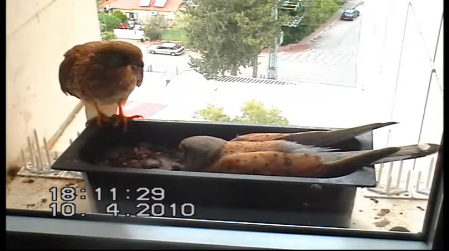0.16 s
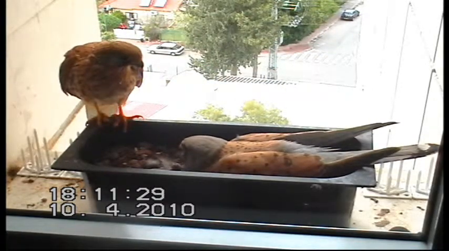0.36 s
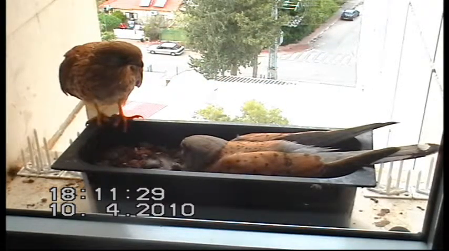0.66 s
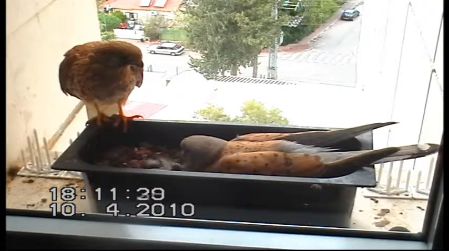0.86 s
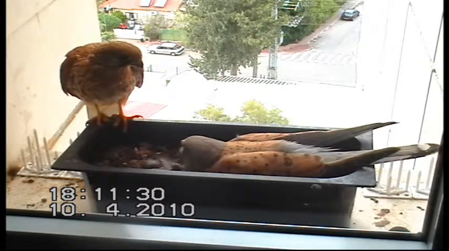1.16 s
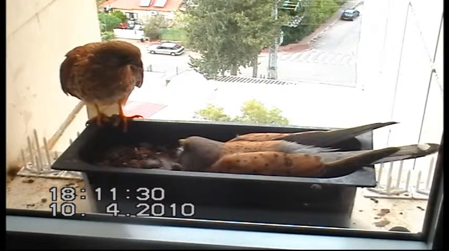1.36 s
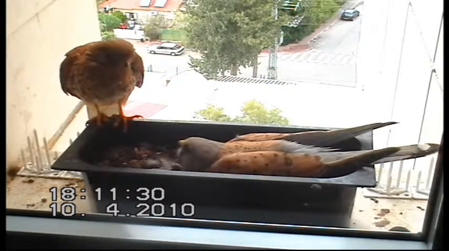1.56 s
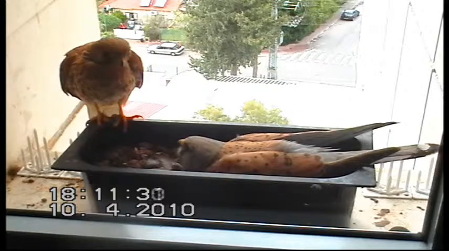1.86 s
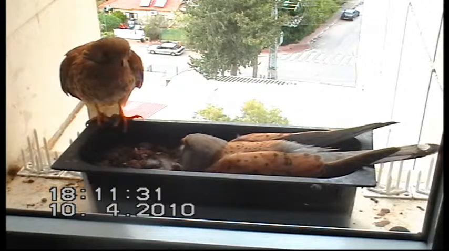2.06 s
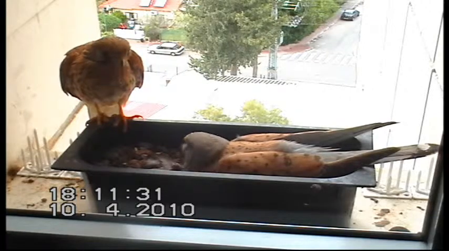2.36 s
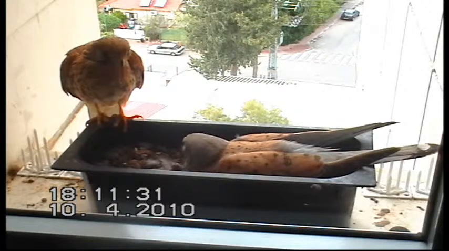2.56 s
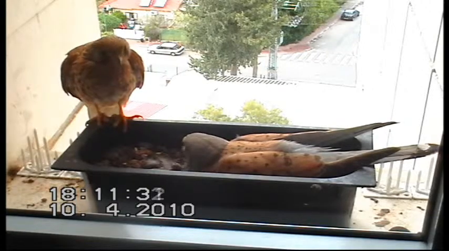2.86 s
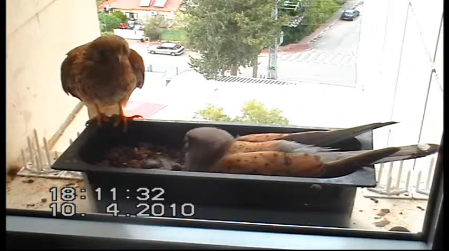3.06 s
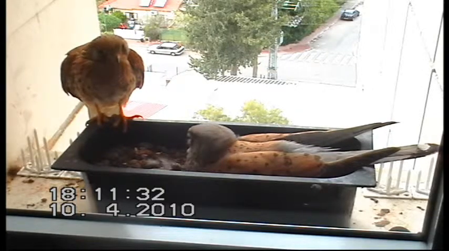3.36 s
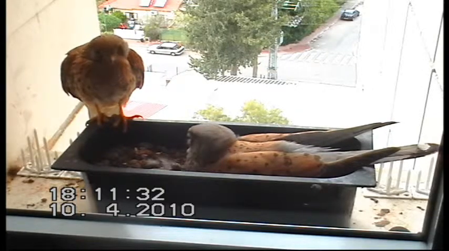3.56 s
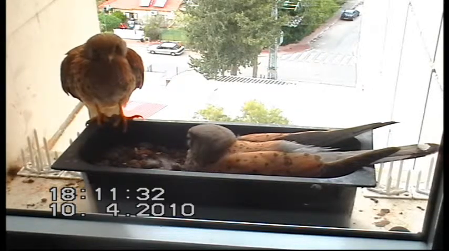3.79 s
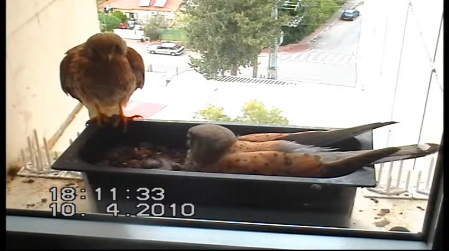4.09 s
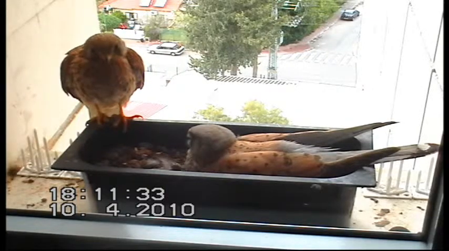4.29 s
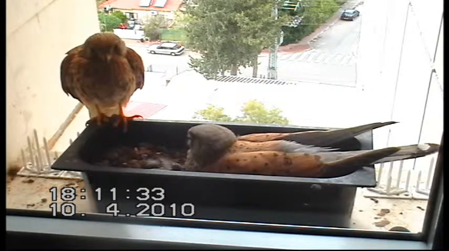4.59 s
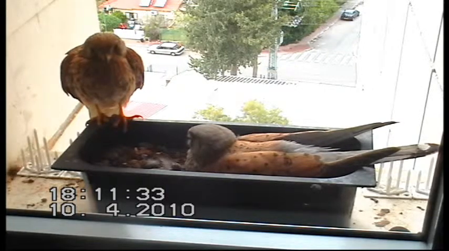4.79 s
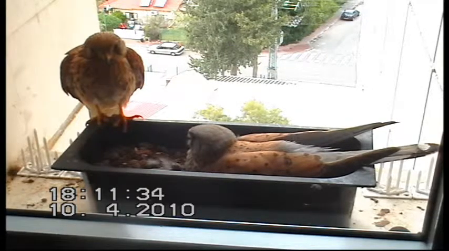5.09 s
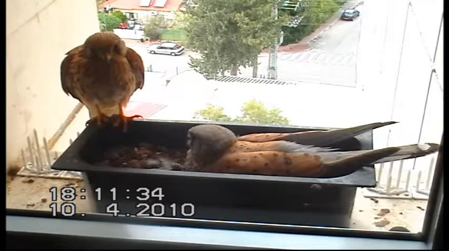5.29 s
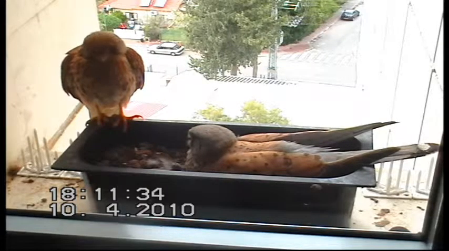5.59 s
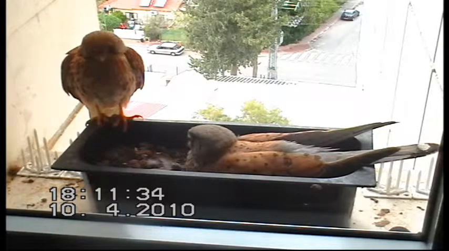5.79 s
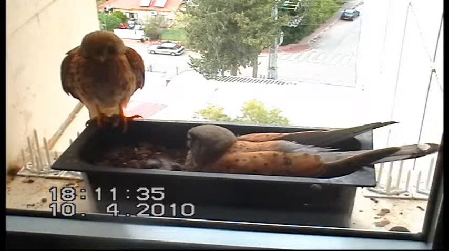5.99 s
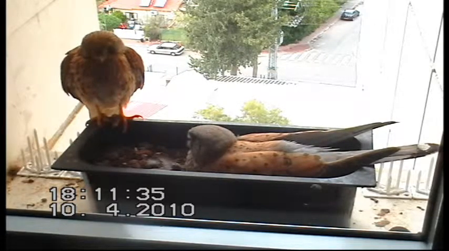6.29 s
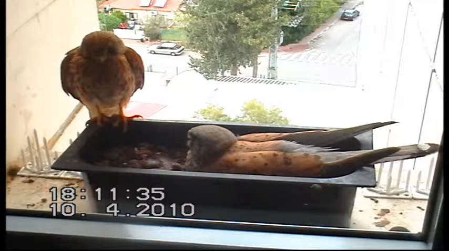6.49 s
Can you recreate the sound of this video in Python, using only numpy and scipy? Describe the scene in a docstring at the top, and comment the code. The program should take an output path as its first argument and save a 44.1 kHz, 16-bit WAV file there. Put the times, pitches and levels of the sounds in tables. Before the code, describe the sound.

Two small falcons call close to a single microphone at a balcony nest box. A low rough cluck right at the start is overlapped by a sharp, high, raspy chip. More chips follow at about 0.5, 1.0, 1.5, 1.85, 2.3, 2.75 and 3.3 seconds, each a tiny piercing burst of around two hundredths of a second, with a quieter, buzzy, lower cluck at 1.3. After a gap, one last, slightly lower chip comes at 4.2, then softer harsh clucks at 4.55, 5.0 and 6.3. A barely noticeable tick leads each call, and hard surfaces return a quick boxy slap with a very short tail. Throughout, faint traffic far below rumbles and whooshes, wavering and thinning towards the end, with weak drones swelling. Tiny distant birds twitter near 1.7, 2.5, 3.6, 4.75 and after 6.1 seconds. Light hiss; centred sound.

```python
"""Two kestrels at a balcony nest box

They trade short sharp chips and a few lower, harsher clucks, each led by a faint tick.
The calls are sums of harmonics under one arch of effort, with jitter and air noise for roughness.
Box, wall and window throw them back: discrete echoes, scatter and a thin tail in one impulse response.
Far below, shaped noise makes the traffic of a quiet street, and small birds twitter as wobbling sines."""
import sys
import numpy as np
from scipy import signal
from scipy.fft import rfft, irfft
from scipy.io import wavfile

SR = 44100
rng = np.random.default_rng(int(sys.argv[2]) if len(sys.argv) > 2 else 0)


def unload_wav(signal):
    """Save mono or channel-first audio to the path in sys.argv[1] as 16-bit WAV at rate SR, clipped to [-1, 1]."""
    wavfile.write(
        sys.argv[1],
        SR,
        np.round(np.clip(np.atleast_2d(signal).T, -1, 1) * 32767).astype(np.int16),
    )


N = 292824
TIME_S = np.arange(N) / SR
BINS_HZ = np.maximum(np.fft.rfftfreq(N, 1 / SR), 1)

# high chips: (time [s], tick lead [s], pitch [Hz], length [s], fundamental [dB], octave [dB],
#   top harmonics re octave [dB], half-order lines [dB])
CHIPS = [(.033, .023, 3585, .021, -21.2, -16.7, -18, -31),
         (.525, .023, 3690, .022, -22.3, -17.6, -18, -32.5),
         (1.017, .019, 3709, .026, -21.4, -20.6, -16, -40),
         (1.48, .021, 3570, .021, -20.7, -16.2, -17, -31.5),
         (1.846, .022, 3496, .021, -17.7, -14.1, -19, -39.5),
         (2.266, .02, 3535, .024, -19.2, -19.2, -17.5, -55.5),
         (2.748, .024, 3585, .02, -23, -14.2, -24, -46), (3.306, .022, 3530, .021, -21, -19, -16, -40),
         (4.182, .024, 3330, .016, -19, -16.8, -20, -39)]
# low clucks: (time [s], tick lead [s], pitch [Hz], starting pitch [ratio], length [s], level [dB],
#   lift of harmonics 2 and 4 [dB], tilt about harmonic 3 [dB/harmonic],
#   slope above harmonic 5 [dB/harmonic], roughness [0-1])
CLUCKS = [(-.011, .024, 1445, 1.0, .024, -31.7, -4.5, -1.5, -1.5, .35),
          (1.327, .021, 1475, 1.0, .023, -26.8, -4, -.5, -2.6, .54),
          (4.553, .0196, 1478, 1.0, .023, -29, 0, -1.1, -1.8, .52),
          (4.983, .026, 1590, 1.06, .016, -30.3, 11.2, 1.1, -6, .22),
          (6.325, .024, 1530, 1.09, .02, -28, -.7, 1.2, -10, .34)]
# low rumble spectrum: (frequency [Hz], relative level [dB per Hz])
RUMBLE = [(12, -7), (25, -1), (45, 0.5), (65, -3), (120, -8), (210, -14.5), (280, -14.5), (400, -23.5),
          (700, -34), (1500, -61)]


def from_db(db):
    """Decibels to gain."""
    return 10 ** (np.asarray(db) / 20)


def rms_one(x):
    """Scale to rms 1."""
    return x / np.sqrt(np.mean(x ** 2) + 1e-20)


def add(track, start_s, sound):
    """Mix a sound into a track, dropping what falls outside it."""
    at = round(start_s * SR) + np.arange(len(sound))
    inside = (at >= 0) & (at < N)
    track[at[inside]] += sound[inside]


def band(x, low_hz, high_hz):
    """Causal band-pass."""
    sos = signal.butter(2, [low_hz, min(high_hz, .45 * SR)], "band", fs=SR, output="sos")
    return signal.sosfilt(sos, x)


def wobble(size, rate_hz):
    """Random curve: unit-variance knots at rate_hz, joined by straight lines."""
    position = np.arange(size) * rate_hz / SR
    knots = int(position[-1]) + 2
    return np.interp(position, np.arange(knots), rng.standard_normal(knots))


def noise(spectrum, peaks=()):
    """Noise of rms 1 with a smooth spectrum and resonances on top."""
    hz, db = np.transpose(spectrum)
    level_db = np.interp(np.log(BINS_HZ), np.log(hz), db)
    for centre_hz, width_hz, lift_db in peaks:
        level_db = level_db + lift_db / (1 + (2 * (BINS_HZ - centre_hz) / width_hz) ** 2)
    return rms_one(irfft(rfft(rng.standard_normal(N)) * from_db(level_db), N))


def street(rumble_db=-58.5, engine_lift_db=.2, waver_db=.4, waver_hz=3):
    """Far traffic: steady rumble, engine and tyre noise of wavering level, drones that swell and fade."""
    # spectra: (frequency [Hz], relative level [dB per Hz])
    engine_spectrum = [(250, -28), (450, -8.5), (560, -0.5), (760, -2.5), (1100, -3.5), (1700, -3.5),
                       (2200, -2), (2800, -8), (4500, -30)]
    tyre_spectrum = [(1000, -19.5), (2000, -11), (2800, 2.5), (3500, -3.5), (4500, -8.5), (6000, -16),
                     (8000, -32), (12000, -45)]
    # resonances colouring the engines: (centre [Hz], width [Hz], lift [dB])
    colour = [(285, 60, 1.5), (860, 81, 8.5), (1018, 70, 7), (1201, 100, 7), (1426, 88, 7),
              (2016, 120, 3.5)]
    # level course: (time [s], engines before lift [dB], tyres [dB])
    levels = [(0.0, -58, -63), (0.29, -62, -67), (0.89, -60, -63), (1.89, -61, -64), (2.03, -62, -67),
              (3.29, -62, -65), (3.59, -62, -66), (4.01, -63, -62), (4.6, -62, -67), (5.53, -62, -70),
              (5.66, -63, -68), (6.64, -65, -70)]
    # drones: (middle [s], spread [s], centre [Hz], width [Hz], level at the middle [dB])
    passes = [(.48, .32, 2196, 220, -61.5), (.96, .16, 1150, 600, -62), (2.55, .45, 1440, 120, -68),
              (3.15, .23, 675.5, 100, -68.5), (3.9, .18, 3095, 1000, -61), (4.75, .655, 867.9, 60, -66),
              (5.65, .266, 1226, 80, -66.5), (5.62, .15, 2600, 700, -70)]

    level_s, engine_db, tyre_db = np.transpose(levels)
    waver = waver_db * wobble(N, waver_hz)
    engine_gain = from_db(np.interp(TIME_S, level_s, engine_db) + engine_lift_db + waver)
    tyre_gain = from_db(np.interp(TIME_S, level_s, tyre_db) + waver)
    out = from_db(rumble_db) * noise(RUMBLE)
    out += engine_gain * noise([*engine_spectrum, (9000, -69.5)], colour)
    out += tyre_gain * noise(tyre_spectrum)
    for middle_s, spread_s, hz, width_hz, db in passes:
        drone = rms_one(band(rng.standard_normal(N), hz - width_hz / 2, hz + width_hz / 2))
        swell = np.exp(-((TIME_S - middle_s) / spread_s) ** 2)
        out += from_db(db) * drone * swell
    return out


def twitters(lift_db=2.5):
    """Distant small birds: sines of unsteady pitch with soft edges."""
    # (time [s], pitch [Hz], length [s], peak level before lift [dB])
    twitter_notes = [(1.70, 7000, .06, -76.5), (2.53, 5040, 0.046, -70.5), (3.607, 5060, .06, -69),
                     (4.744, 6270, .07, -78), (4.755, 5350, 0.057, -75), (6.169, 5720, .05, -76),
                     (6.509, 5300, 0.034, -77)]
    out = np.zeros(N)
    for start_s, hz, length_s, db in twitter_notes:
        size = int(length_s * SR)
        phase = 2 * np.pi * np.cumsum(hz * (1 + .065 * wobble(size, 900))) / SR
        add(out, start_s, from_db(db + lift_db) * np.sin(phase) * signal.windows.tukey(size, .7))
    return out


def balcony(x, scatter_db=-9, scatter_t60_s=.065, tail_db=-30, tail_t60_s=.2, tail_top_hz=8500):
    """A few hard echoes, quick scatter in the nest box, and a thin, duller tail from the open balcony."""
    # box walls, window and floor: (delay [s], level re direct [dB])
    echo_taps = [(.00111, -19), (.00206, -17.5), (.0029, -21), (.0032, -19), (.00444, -21), (.00669, -10.5),
                 (.0112, -19), (.0153, -23)]
    t = np.arange(SR // 3) / SR
    scatter, tail = rng.standard_normal((2, len(t))) * np.minimum(t / .005, 1)
    scatter = scatter * from_db(-60 * t / scatter_t60_s)
    tail = band(tail, 500, tail_top_hz) * from_db(-60 * t / tail_t60_s)
    response = from_db(scatter_db) * scatter / np.linalg.norm(scatter)
    response += from_db(tail_db) * tail / np.linalg.norm(tail)
    response[0] = 1  # direct sound
    for delay_s, db in echo_taps:
        response[round(delay_s * SR)] += from_db(db)
    return signal.fftconvolve(x, response)[:N]


def rasp(size, low_hz, high_hz):
    """Air noise with steep band edges, rms 1."""
    return rms_one(band(band(rng.standard_normal(size), low_hz, high_hz), low_hz, high_hz))


def box_colour(x, low_hz=3130, high_hz=14500):
    """Keeps the chip between its fundamental and the far treble, and rings near its two main lines."""
    # resonances of the nest box around the bird: (centre [Hz], width [Hz], added level [dB])
    resonances = [(3457, 110, -6), (7160, 400, -14)]
    x = band(band(x, low_hz, high_hz), low_hz, high_hz)
    out = x.copy()
    for hz, width_hz, db in resonances:
        b, a = signal.iirpeak(hz, hz / width_hz, fs=SR)
        out += from_db(db) * signal.lfilter(b, a, x)
    return out


def syrinx(gesture, pitch_hz, length_s, jitter, jitter_hz, shimmer_db, start_ratio=1):
    """Phase and strength of the vibrating membrane through one note; its pitch bends with the effort."""
    size = int(length_s * SR)
    along = np.arange(size) / size
    peak, start_db, end_db, bend_per_db = gesture
    rise_db = start_db * (1 - along / peak) ** 2
    fall_db = end_db * ((along - peak) / (1 - peak)) ** 2
    effort_db = np.where(along < peak, rise_db, fall_db)
    settling = np.interp(along, [.2, .45], [start_ratio, 1])
    hz = pitch_hz * settling * (1 + bend_per_db * effort_db) * (1 + jitter * wobble(size, jitter_hz))
    effort = from_db(effort_db + shimmer_db * wobble(size, jitter_hz))
    return 2 * np.pi * np.cumsum(hz) / SR, effort * signal.windows.tukey(size, .08)


def ticks(pitch_hz=1630, decay_s=.0055, start_db=-44.5):
    """A faint tick just before each call: unsteady harmonics and noise, band-passed, dying away fast."""
    out, t = np.zeros(N), np.arange(SR // 60) / SR
    for start_s, lead_s, *_ in [*CHIPS, *CLUCKS]:
        phase = 2 * np.pi * np.cumsum(pitch_hz * (1 + .06 * wobble(len(t), 700))) / SR
        buzz = sum(np.sin(k * phase + k * k) for k in range(1, 8)) + rng.standard_normal(len(t))
        tick = rms_one(band(buzz, 2500, 5400)) * np.exp(-t / decay_s)
        add(out, start_s - lead_s, from_db(start_db) * tick)
    return out


def clucks(rasp_db=-33, crack_db=-35, crack_decay_s=.003):
    """The low register: a crack as the membrane starts, then a buzzy stack of unsteady harmonics."""
    # arch of effort: (peak [share of length], start [dB], end [dB], pitch change [1/dB of effort])
    cluck_gesture = (.33, -11, -22, .004)
    # harmonics 1-5 before each cluck's own lift and tilt: level [dB]
    harmonics_db = np.array([-6.3, -2.9, 0, -3.9, -10.6])
    out = np.zeros(N)
    overtone = np.arange(len(harmonics_db))
    for start_s, _, pitch_hz, start_ratio, length_s, level_db, even_db, tilt_db, slope_db, rough in CLUCKS:
        phase, effort = syrinx(cluck_gesture, pitch_hz, length_s, .039 * rough, 900, 3.4 * rough, start_ratio)
        size = len(phase)
        lower_db = level_db + harmonics_db + even_db * (overtone % 2) + tilt_db * (overtone - 2)
        upper_db = lower_db[-1] + slope_db * np.arange(1, 5)
        note = np.zeros(size)
        for k, db in enumerate(np.concatenate([lower_db, upper_db])):
            unsteady = 1 + .84 * rough * wobble(size, 700)
            # k * k [rad] spreads the phases of the harmonics
            note += from_db(db) * unsteady * np.sin((k + 1) * phase + k * k)
        crack = from_db(crack_db) * np.exp(-np.arange(size) / SR / crack_decay_s)
        air = from_db(rasp_db) * rough * np.sqrt(effort) + crack
        add(out, start_s, effort * note + air * rasp(size, 2500, 7800))
    return out


def chips(fourth_db=-10, onset_db=-4, onset_decay_s=.002):
    """A thin, rough note; its octave grows faster than its fundamental when the bird drives it harder."""
    # arch of effort: (peak [share of length], start [dB], end [dB], pitch change [1/dB of effort])
    chip_gesture = (.41, -24, -20.5, -.0065)
    # air noise, strongest just above the two main lines: (low [Hz], high [Hz], level before envelope [dB])
    rasps = [(3430, 4800, -34), (7080, 8600, -36), (3500, 11000, -46)]
    out = np.zeros(N)
    for start_s, _, pitch_hz, length_s, first_db, octave_db, top_db, half_db in CHIPS:
        phase, effort = syrinx(chip_gesture, pitch_hz, length_s, jitter=.016, jitter_hz=897, shimmer_db=1.5)
        size = len(phase)
        # the top harmonics break up most
        top = np.sin(3 * phase) + from_db(fourth_db) * np.sin(4 * phase)
        top *= .7 + .7 * wobble(size, 1000)
        note = from_db(first_db) * np.sin(phase) * effort ** .71 * (.9 + .4 * wobble(size, 800))
        note += from_db(octave_db) * (np.sin(2 * phase) * effort ** 1.3 + from_db(top_db) * top * effort)
        # air bursts out at the onset and rasps on
        air = sum(from_db(db) * rasp(size, low_hz, high_hz) for low_hz, high_hz, db in rasps)
        onset = from_db(onset_db) * np.exp(-np.arange(size) / SR / onset_decay_s)
        note += air * (effort ** .3 + onset)
        # alternate cycles differ now and then, which adds lines between the harmonics
        halves = np.sin(3 * phase / 2)
        halves += from_db(-19) * np.sin(phase / 2) + from_db(-14.5) * np.sin(5 * phase / 2)
        halves *= from_db(half_db) * effort * (.7 + .94 * wobble(size, 900))
        add(out, start_s, box_colour(note) + halves)
    return out


def scene():
    """One microphone hears everything, so both channels carry the same sound."""
    calls = ticks() + clucks() + chips()
    mono = street() + twitters() + balcony(calls)
    return np.array([mono, mono])


def record(dry, shared_hiss_db=-81.5, own_hiss_db=-87, own_rumble_db=-92, cutoff_hz=15300):
    """The recorder adds shared hiss, fainter hiss and rumble of each channel's own, and cuts the top."""
    # hiss spectrum: (frequency [Hz], relative level [dB per Hz])
    hiss_spectrum = [(2000, -6.5), (8000, 4), (11700, 3.5), (12500, -0.5), (15000, -10.5), (16000, -16.5)]
    own = [from_db(own_hiss_db) * noise(hiss_spectrum) + from_db(own_rumble_db) * noise(RUMBLE)
           for channel in range(2)]
    floor = from_db(shared_hiss_db) * noise(hiss_spectrum) + np.array(own)
    top_cut = signal.ellip(10, .2, 80, cutoff_hz, fs=SR, output="sos")
    return signal.sosfilt(top_cut, dry + floor)


dry = scene()
out = record(dry)
unload_wav(out)
```